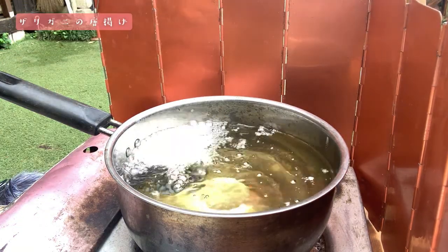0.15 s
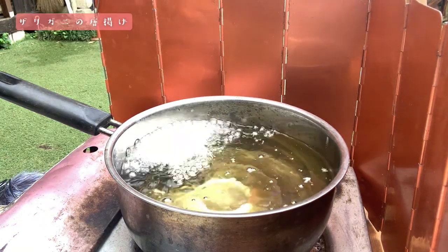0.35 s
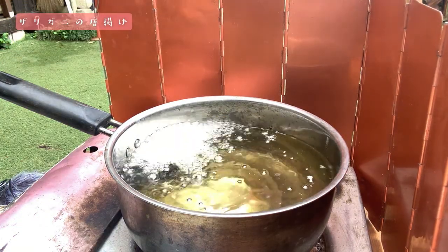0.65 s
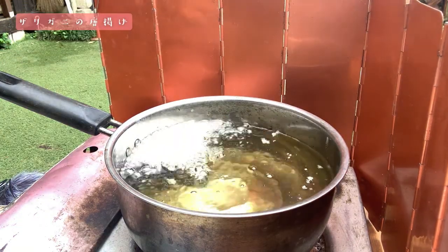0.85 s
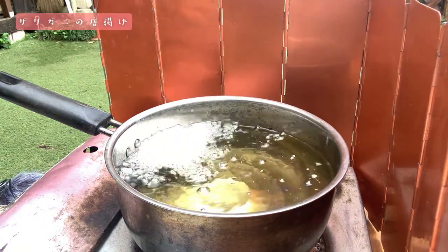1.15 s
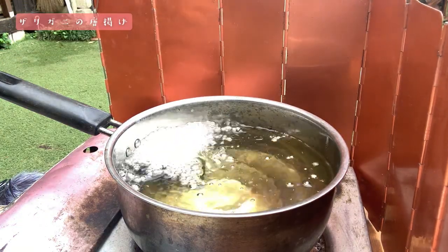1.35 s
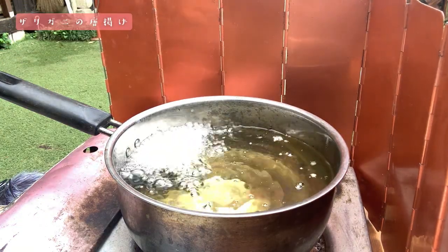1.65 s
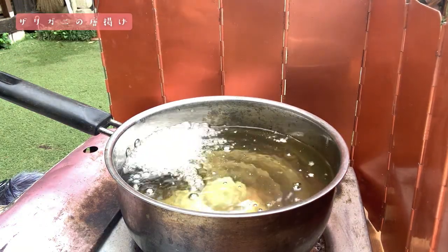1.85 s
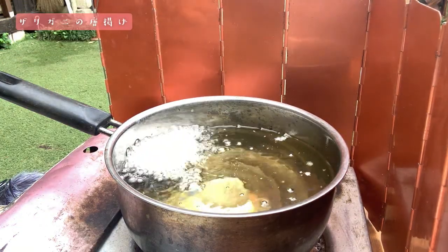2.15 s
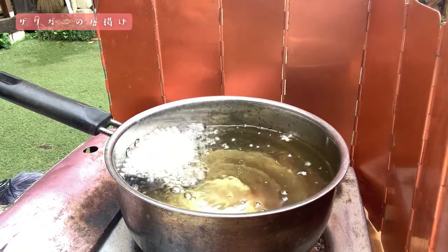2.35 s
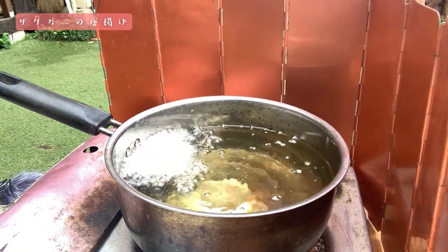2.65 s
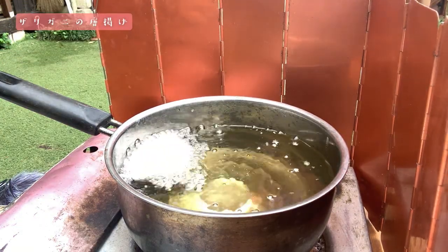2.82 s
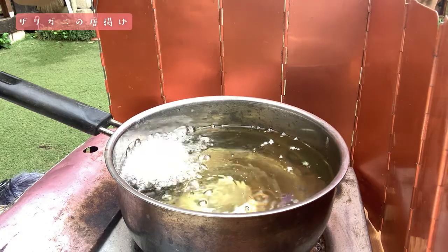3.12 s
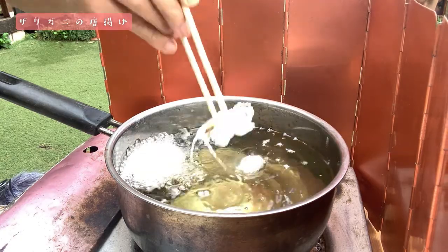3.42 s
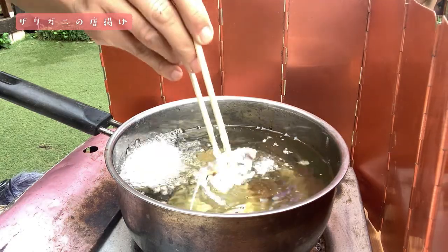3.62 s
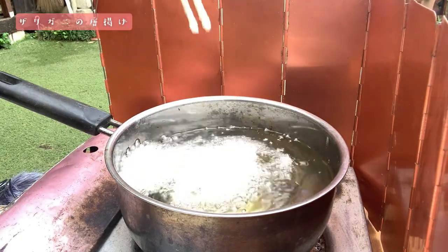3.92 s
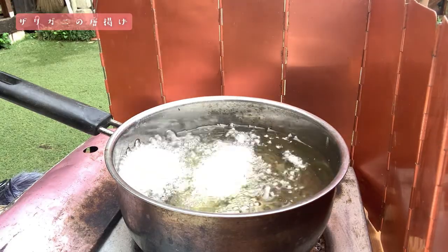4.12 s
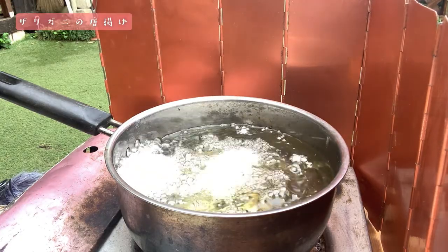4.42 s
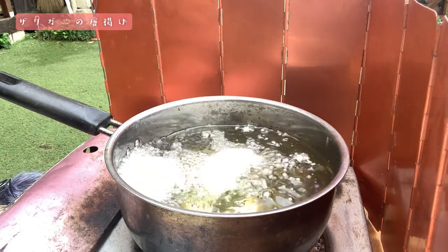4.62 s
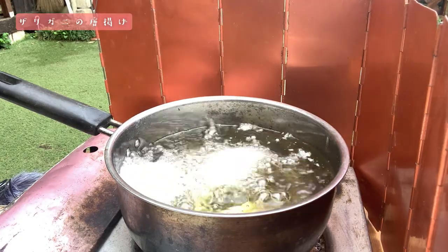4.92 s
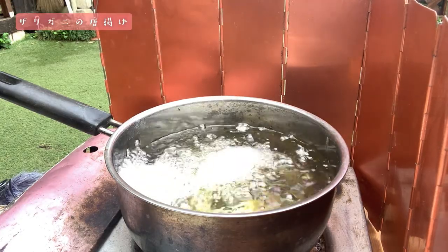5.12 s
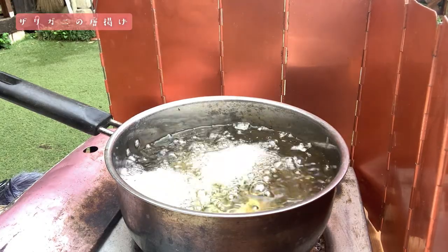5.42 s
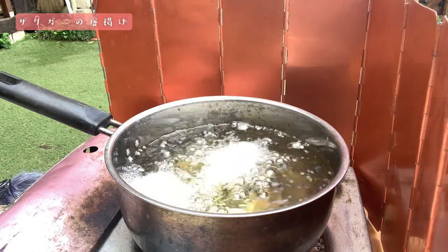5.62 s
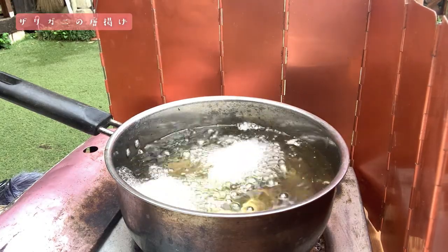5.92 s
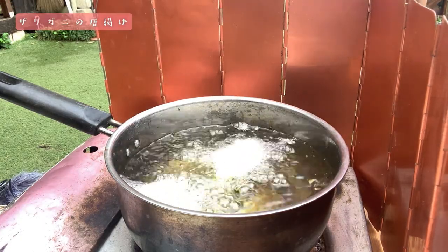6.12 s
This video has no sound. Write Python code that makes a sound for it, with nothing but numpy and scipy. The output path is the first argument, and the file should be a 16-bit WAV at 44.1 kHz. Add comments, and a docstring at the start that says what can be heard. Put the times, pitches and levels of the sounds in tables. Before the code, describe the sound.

Batter frying in a steel pan of hot oil outdoors, ringing metallic pops, fine fizz and dry snaps, then a new piece slides in hissing.

```python
"""Fine fizz, a fading low tone and, at once, a volley of ringing bursts: batter fries in a steel saucepan of hot oil.
The place is outdoors, in front of a sheet-metal wind shield; burner and open air rush evenly behind the pan.
Steam pockets burst in the oil and set the metal ringing; droplets sputter and small bubbles snap dryly.
After three seconds a new piece drips and slides in with a bright hiss.
A light breeze and a few low puffs brush the microphone."""
import sys
import numpy as np
from scipy import signal
from scipy.fft import irfft
from scipy.io import wavfile

SR = 44100
rng = np.random.default_rng(int(sys.argv[2]) if len(sys.argv) > 2 else 0)


def pcm_store(signal):
    """Save signal as 16-bit PCM."""
    levels = np.round(np.clip(np.atleast_2d(signal), -1, 1) * 32767)
    wavfile.write(sys.argv[1], SR, levels.astype(np.int16).T)


N = 276066


def gain_of(db):
    """Amplitude factor of a level in dB."""
    return 10 ** (np.asarray(db) / 20)


def evened(x):
    """The same sound at rms 1."""
    return x / np.sqrt(np.mean(x ** 2) + 1e-20)


def read(points, hz):
    """A spectrum in dB, joined on a log-frequency axis."""
    f, value = np.transpose(points)
    return np.interp(np.log(hz + 1), np.log(f + 1), value)


def level(curve):
    """A dB curve over time as a gain for every sample."""
    return gain_of(np.interp(np.arange(N) / SR, *np.transpose(curve)))


def add(mix, s, sound):
    """Lays a sound into the mix at s seconds, cut off at the end of the mix."""
    part = mix[max(round(s * SR), 0):][:len(sound)]
    part += sound[:len(part)]


def dying(t, t60):
    """Exponential decay that falls 60 dB in t60 seconds."""
    return np.exp(-np.log(1000) * t / t60)


def causal(db_at, size=2048):
    """Minimum-phase impulse response with the shape of a dB spectrum, scaled to energy 1."""
    hz = abs(np.fft.fftfreq(size, 1 / SR))
    log_gain = np.log(gain_of(db_at(hz)))
    minimum_phase = np.exp(np.conj(signal.hilbert(log_gain)))
    response = np.fft.ifft(minimum_phase).real[:size // 2]
    return response / np.linalg.norm(response)


def coloured(x, spectrum):
    """Filters x by a spectrum; rms 1."""
    response = causal(lambda hz: read(spectrum, hz), size=8192)
    return evened(signal.oaconvolve(x, response)[:len(x)])


def cavity(hz, pitch_hz, q, slope, leak_db=-20):
    """dB spectrum of a bursting bubble: weak below its resonance, sloping above, dull at the very top."""
    r = hz / pitch_hz
    resonance = r ** 4 / ((1 - r ** 2) ** 2 + (r / q) ** 2) + gain_of(leak_db) ** 2
    ends = [(60, -56), (200, 4), (400, 6.5), (6500, 1.5), (9500, -6.5), (16000, -17.5)]  # f/Hz, level/dB
    tilt_db = slope * np.log2(1 + r ** 2) / 2
    return 10 * np.log10(resonance) + tilt_db + read(ends, hz)


def strong_few(most):
    """Random strength for every sample: mostly small, now and then large, never above most."""
    return np.minimum(rng.exponential(1, N), most)


def crackle(per_s, spread_db, q, low_hz, high_hz, count=14):
    """A swarm of tiny bubbles of many pitches, most faint and a few strong; rms 1."""
    out = np.zeros(N)
    for pitch_hz in np.geomspace(low_hz, high_hz, count):
        strength_db = spread_db * strong_few(3)
        clicks = gain_of(strength_db) * (rng.random(N) < per_s / count / SR)
        bubble = causal(lambda hz: cavity(hz, pitch_hz, q, slope=2.5), size=512)
        out += signal.oaconvolve(clicks, bubble)[:N]
    return evened(out)


# Rise and fall of the fine bubbling round the food: t/s, level/dB
FIZZ_LEVEL = [(0, -53.5), (1.2, -50), (1.8, -60), (2.3, -53), (2.65, -43.5), (3, -50.5), (3.5, -51.5),
              (5, -45), (5.5, -55.5), (6.26, -51.5)]
# Spectrum of its close prickle: f/Hz, level/dB
FIZZ_COLOUR = [(300, 12), (700, 1.5), (2500, -15), (7000, -15.5), (11000, -20), (16000, -5)]


def fizz(fizz_db=-4, bubbles_db=-4, pinpricks_db=-11):
    """Steam leaves the food: a close prickle, rounder bubbles that stand out of it, and the finest bright ticks."""
    swarm = crackle(per_s=500, spread_db=10.5, q=3.4, low_hz=1080, high_hz=8950)
    prickle = gain_of(fizz_db) * coloured(swarm, FIZZ_COLOUR)
    rounder = crackle(per_s=140, spread_db=4.5, q=10, low_hz=1600, high_hz=7130)
    ticks = crackle(per_s=29, spread_db=7.5, q=1.4, low_hz=8000, high_hz=14000, count=4)
    return level(FIZZ_LEVEL) * (prickle + gain_of(bubbles_db) * rounder + gain_of(pinpricks_db) * ticks)


def hum(hz=121.0, db=-53, t60=2.5):
    """A faint low sine tone dies away exponentially from the start."""
    t = np.arange(N) / SR
    return gain_of(db) * np.sin(2 * np.pi * hz * t) * dying(t, t60)


# A light breeze on the microphone, whose level wavers by this rms, at random rates up to this one
BREEZE_DB, BREEZE_WAVER_DB, BREEZE_WAVER_HZ = -64.5, 6.5, 13
# Soft low puffs of air, as from a hand moving near the microphone:
# t/s of the crest, level/dB, half width/s (where the puff is down to 1/e)
PUFFS = [(3.1, -67, .2), (3.8, -51.5, 0.12), (4.24, -49.5, 0.049), (4.369, -43, 0.028), (4.5, -52, 0.076),
         (5.7, -61, 0.085)]


def air_strength(count=20):
    """The breeze wavers by chance; each puff of air rises and falls on top of it."""
    t = np.arange(N) / SR
    waver = np.zeros(N)
    for share, phase in rng.random((count, 2)):
        waver += np.sin(2 * np.pi * (BREEZE_WAVER_HZ * share * t + phase))
    puffs = sum(gain_of(db) * np.exp(-((t - s) / width_s) ** 2) for s, db, width_s in PUFFS)
    return gain_of(BREEZE_DB + BREEZE_WAVER_DB * evened(waver)) + puffs


RUSH_DB = -52
# Spectrum of burner and open air: f/Hz, level/dB
RUSH_COLOUR = [(20, -40), (45, -9), (80, -2), (170, -3), (480, -1), (640, -6), (800, -2), (1400, -2),
               (2600, -3), (4500, -10), (7500, -17), (10000, -26), (16000, -32)]
# Spectrum of breeze and puffs at the microphone: f/Hz, level/dB
BREEZE_COLOUR = [(25, -34), (45, -3), (70, 2), (100, -1.5), (170, -9.5), (300, -36), (700, -26)]


def outdoors():
    """Coloured noise: the even rush of burner and open air, and the low rumble of breeze and puffs."""
    rush, rumble = rng.standard_normal((2, N))
    return gain_of(RUSH_DB) * coloured(rush, RUSH_COLOUR) + air_strength() * coloured(rumble, BREEZE_COLOUR)


def struck(modes, t, spread_db):
    """Modes struck at a random place, which decides how strongly each one answers; starts at about rms 1."""
    hz, db, t60 = np.transpose(modes)
    weights = gain_of(db + spread_db * rng.standard_normal(len(hz)))
    turns = hz[:, None] * t + rng.random((len(hz), 1))
    decay = dying(t.astype(np.float32), t60[:, None].astype(np.float32))
    ring = np.sin((2 * np.pi * turns).astype(np.float32)) * decay
    return np.sqrt(2) * (weights @ ring) / np.linalg.norm(weights)


def clang(t, t60, gap_hz=55, spread_db=5.5, lumps_db=3, lump_hz=260, treble_life=0.76,
          linger_db=-17, linger_t60=0.38):
    """The metal's crowd of short modes, uneven in strength; treble dies at its own rate, a faint part lingers."""
    hz = np.fft.rfftfreq(len(t), 1 / SR)
    knots = np.arange(0, SR / 2, lump_hz)
    lumps = np.interp(hz, knots, rng.standard_normal(len(hz))[:len(knots)])
    treble = 1 / (1 + (6000 / (hz + 1)) ** 4)

    def crowd(share):
        """Random modes, denser with pitch, in the given share of the spectrum's power."""
        present = rng.random(len(hz)) < hz[1] / gap_hz * (1 + hz / 4000)
        weights = present * gain_of(lumps_db * lumps + spread_db * rng.standard_normal(len(hz)))
        lines = weights * np.exp(2j * np.pi * rng.random(len(hz)))
        return evened(irfft(lines * np.sqrt(share))) * np.sqrt(share.mean())

    body = crowd(1 - treble) * dying(t, t60)
    bright = crowd(treble) * dying(t, t60 * treble_life)
    lingering = gain_of(linger_db) * crowd((1 - treble) ** 2) * dying(t, linger_t60)
    return body + bright + lingering


# Small, high cavities die sooner and ring the pan less; decay and ring level below hold at MID_HZ
MID_HZ = 1000
BURST_T60_S, T60_POWER = 0.16, -0.28  # decay time, its power of pitch
# The pan's ring for a burst of 0 dB, the share of the burst's dB that it follows, its change with pitch
RING_DB, RING_FOLLOWS, RING_DB_PER_OCTAVE = -25, 0.47, -1.86
# Treble slope above the cavity pitch, in dB per octave: a base for Q 1, and a rise with sharpness
BURST_SLOPE_DB, SLOPE_DB_PER_DOUBLING_Q = -2.5, 0.47
# Extra slope of a small burst at SMALL_HZ; it goes with the square of pitch
SMALL_SLOPE_DB, SMALL_HZ = 3.5, 5000
SHIELD_T60_S = 0.24
# Strongest modes of the thin wind shield: f/Hz, level/dB
SHIELD_MODES = [(432, -3), (538, -2), (758, 1), (844, 1), (1105, 1), (1290, 0), (1470, 2), (1799, 2),
                (2421, 3), (3383, 0), (3571, 0)]
# Long modes of the steel pan: f/Hz, level/dB, t60/s
PAN_MODES = [(662, 0, 1.15), (758, 2, .3), (904, 0, .25), (1061, 0, .6), (1136, 0, .3), (1410, -3, .5),
             (1484, 0, .75), (1530, 0, .45), (1663, -1, .35), (1799, -2, .35), (1866, -4, .7),
             (1908, -1, .55), (2363, 0, .95), (2480, -4, .5), (2730, -2, .35), (2940, 0, .4),
             (3085, -2, .4), (3735, -1, .35), (3897, 0, .4)]
# Steam bursts in the oil: t/s, level/dB, cavity pitch f/Hz, sharpness Q, centre of the pan modes struck f/Hz
STEAM_BURSTS = [(.001, -31, 1240, 2.9, 1390), (.032, -16, 4600, 1.3, 1600), (0.035, -21.5, 1480, 14, 1560),
                (0.078, -21, 1390, 4.1, 1500), (.142, -24, 800, 2, 1040), (.284, -29.5, 940, 1.2, 1200),
                (.513, -25.5, 830, 0.48, 1190), (0.57, -14.5, 930, 1.2, 1240), (.656, -26, 844, .8, 850),
                (.792, -15, 603, 0.39, 740), (0.821, -19.5, 810, 5.5, 800), (.858, -24.5, 590, 0.47, 1900),
                (.885, -21, 3980, 2.3, 2280), (.917, -26, 2600, 1, 2530), (1, -29.5, 4760, 2.2, 3750),
                (1.3953, -19.5, 3430, 2, 1530), (1.418, -20.5, 3340, 1, 2900),
                (1.552, -19, 5700, 4.6, 2560), (2.151, -34, 4860, 18, 3640), (2.443, -41, 1970, 0.5, 4000),
                (2.838, -21, 3780, 4.5, 3100), (3.08, -19.5, 2560, 0.64, 2720),
                (3.095, -14, 1020, 1.8, 1220), (3.154, -31, 1610, 0.17, 1670),
                (3.236, -27.5, 6860, 9.3, 3000), (3.483, -29.5, 2070, 1, 3000),
                (3.656, -25.5, 460, 3.5, 1340), (3.683, -27.5, 980, 1.3, 1280),
                (3.714, -23.5, 4000, 1.5, 3700), (3.814, -20, 2080, 0.76, 1980),
                (3.859, -29, 1850, 0.44, 1710), (3.89, -18, 1610, .7, 1850), (4.034, -24, 5640, 3.9, 3020),
                (4.038, -20.5, 1070, 6.7, 1170), (4.308, -18.5, 1440, 1.54, 1750),
                (4.415, -21.5, 2020, 0.5, 2000), (4.545, -19, 1830, .65, 1820),
                (4.644, -27.5, 1260, 0.43, 1800), (4.678, -15.5, 1140, 1.4, 1240),
                (4.751, -24.5, 1060, 0.55, 1680), (4.79, -25, 2800, 1.8, 2800),
                (4.852, -23, 3800, 4.8, 3730), (4.925, -30.5, 540, 1.5, 1900),
                (4.974, -23, 2830, 0.29, 3400), (5.079, -27, 4680, 32, 4500), (5.116, -27, 2770, 2.5, 2680),
                (5.154, -25, 2960, 0.61, 2800), (5.245, -26, 1270, 0.94, 1310),
                (5.291, -25.5, 5630, 4.5, 3770), (5.573, -26, 780, .9, 1340),
                (5.655, -33.5, 1400, 0.28, 1740), (5.733, -21, 1940, 1.8, 1880),
                (5.766, -27.5, 1510, 0.3, 1690), (5.83, -31.5, 5800, 3.2, 3800),
                (6.158, -24, 1180, 1.2, 1350)]


def bursts(shield_db=-19, shield_spread_db=5, shield_detune=0.0088, pan_spread_db=2,
           focus_db=15, focus_power=0.26, rise_s=0.0016, size=32768):
    """Each steam burst shakes shield and pan, coloured by the cavity that it opens in the oil."""
    out, t = np.zeros(N), np.arange(size) / SR
    short = t[:size // 2]
    for s, db, pitch_hz, q, centre_hz in STEAM_BURSTS:
        height = pitch_hz / MID_HZ
        slope = BURST_SLOPE_DB + SLOPE_DB_PER_DOUBLING_Q * np.log2(q)
        slope += SMALL_SLOPE_DB * (pitch_hz / SMALL_HZ) ** 2

        shield = [(hz * (1 + shield_detune * rng.standard_normal()), mode_db, SHIELD_T60_S)
                  for hz, mode_db in SHIELD_MODES]
        metal = clang(short, BURST_T60_S * height ** T60_POWER)
        metal += gain_of(shield_db) * struck(shield, short, shield_spread_db)
        metal *= 1 - np.exp(-short / rise_s)
        colour = causal(lambda hz: cavity(hz, pitch_hz, q, slope))
        add(out, s, gain_of(db) * signal.fftconvolve(metal, colour))

        # the pan sings on, most in the modes near the centre; a sharper burst picks out fewer of them
        ring_db = RING_DB + RING_FOLLOWS * db + RING_DB_PER_OCTAVE * np.log2(height)
        loss_per_octave = focus_db * q ** focus_power
        pan = [(hz, mode_db - loss_per_octave * abs(np.log2(hz / centre_hz)), t60)
               for hz, mode_db, t60 in PAN_MODES]
        ring = struck(pan, t, pan_spread_db) * (1 - np.exp(-t / rise_s))
        add(out, s, gain_of(ring_db) * ring)
    return out


def sputter(db=-12, per_s=75, life_s=0.046, ring_t60=0.031, q=7, spread_db=2.0, count=20, size=4096):
    """Each burst throws up droplets that fall back and pop, weaker where their pitch is below their parent's."""
    out, t = np.zeros(N), np.arange(size) / SR
    flight = np.exp(-np.arange(SR // 2) / SR / life_s)
    for pitch_hz in np.geomspace(700, 9500, count):
        thrown = np.zeros(N)
        for s, burst_db, parent_hz, *_ in STEAM_BURSTS:
            add(thrown, s, gain_of(burst_db) * min(pitch_hz / parent_hz, 1) ** 2 * flight)
        # chance pops at an even rate, heard as far as droplets are in flight
        pops = (rng.random(N) < per_s / count / SR) * gain_of(spread_db * strong_few(2))
        ring = signal.lfilter(*signal.iirpeak(pitch_hz, q, fs=SR), rng.standard_normal(size))
        out += signal.oaconvolve(pops * thrown, evened(ring) * dying(t, ring_t60))[:N]
    return gain_of(db) * out


# Scatter of the faint snaps: level and pitch either way, round this pitch and sharpness
PATTER_SPREAD_DB, PATTER_HZ, PATTER_OCTAVES, PATTER_Q = 5.0, 5100, 1, 2.5
# Spells of faint snaps at random: start t/s, end t/s, snaps per s, level/dB
PATTER = [(0, 6.26, 13, -39.5), (2.4, 2.7, 35, -44)]


def faint_snaps(most=400):
    """Rows like those of LOUD_SNAPS for the small bubbles that break at random."""
    rows = []
    for start, end, per_s, db in PATTER:
        draws = rng.uniform(-1, 1, (most, 4))[:round(per_s * (end - start))]
        for when, force, pitch, sharp in draws:
            s = start + (end - start) * (when + 1) / 2
            pitch_hz = PATTER_HZ * 2 ** (PATTER_OCTAVES * pitch)
            rows.append((s, db + PATTER_SPREAD_DB * force, pitch_hz, PATTER_Q * 2 ** sharp))
    return rows


# Treble slope in dB per octave, at Q 1 and its change: a dry snap is bright, a round plop is dark
SNAP_SLOPE_DB, SNAP_SLOPE_DB_PER_DOUBLING_Q = 5, -3.5
# The loudest surface bubbles snapping: t/s, level/dB over 1 ms, cavity pitch f/Hz, sharpness Q
LOUD_SNAPS = [(0.0321, -11, 4040, 2.5), (.245, -23.5, 3650, 2.6), (0.3365, -26, 6900, 0.23),
              (1.1409, -25, 2220, 3.3), (1.5442, -13.5, 1400, 1.4), (1.552, -6.5, 6260, 1.8),
              (1.6474, -12.5, 1750, 1.05), (1.9062, -34.5, 2000, 1.04), (1.965, -31.5, 2190, 3.4),
              (2.0629, -29.5, 5470, 1.4), (2.1057, -29, 740, 2.3), (2.3985, -29, 9900, 1.8),
              (2.4318, -28, 5630, 0.49), (2.443, -17.5, 2090, 9), (2.4867, -30.5, 900, 1.2),
              (2.516, -16, 3630, 0.63), (2.576, -25, 2500, 1.3), (2.6186, -32.5, 5500, 1.3),
              (2.6847, -37, 2200, 2.5), (2.752, -34, 1500, 0.57), (3.0058, -26.5, 2740, 5.5),
              (3.052, -27, 2070, 1.2), (3.2792, -22, 2600, 3), (3.4137, -27, 2800, 2),
              (3.4903, -24.5, 4800, 1.4), (3.634, -22, 8200, 2.9), (3.956, -28, 6500, 5.5),
              (4.0402, -17, 1070, 3.3), (4.1451, -12, 2160, 7.3), (4.3453, -12.5, 3000, .55),
              (5.0817, -24, 4750, 12), (5.3778, -28, 1500, 2), (5.4149, -24, 3440, 3.7),
              (5.4721, -26.5, 10400, .9), (5.949, -24, 2130, 3.7)]


def snaps(scatter_db=-3, scatter_t60=0.015, wall_db=-17, wall_t60=0.14, size=4096):
    """A bubble's film breaks: a few cycles of its cavity, with faint echoes from the pan wall."""
    out, t = np.zeros(N), np.arange(size) / SR
    millisecond = SR / 1000  # in samples
    for s, db, pitch_hz, q in LOUD_SNAPS + faint_snaps():
        slope = SNAP_SLOPE_DB + SNAP_SLOPE_DB_PER_DOUBLING_Q * np.log2(q)
        paths = signal.unit_impulse(size)  # the direct path
        for echo_db, t60 in ((scatter_db, scatter_t60), (wall_db, wall_t60)):
            echoes = rng.standard_normal(size) * dying(t, t60)
            paths = paths + gain_of(echo_db) * echoes / np.linalg.norm(echoes)
        snap = signal.fftconvolve(paths, causal(lambda hz: cavity(hz, pitch_hz, q, slope)))
        add(out, s, gain_of(db) * np.sqrt(millisecond) * snap / np.linalg.norm(snap))
    return out


# The new piece heats through after the last dip: its hiss grows to this level in this time
HISS_DB, HISS_GROWTH_S = -56.5, 2.5
SEAR_ATTACK_SHARE, SEAR_T60_S = 0.39, 0.24  # the rise takes this share of the hold; decay after the hold
# Spectrum of the flashing steam: f/Hz, level/dB
SEAR_COLOUR = [(400, -18), (1500, -14.5), (3500, -9), (7000, -4.5), (10000, -9), (14000, -5.5),
               (16000, -18)]
# Wet batter meets the oil, first a drip and then the piece: t/s, level/dB, hold/s
DIPS = [(3.326, -33.5, 0.01), (3.575, -34, 0.094)]


def sear():
    """Water on fresh batter flashes to steam: a bright, dense hiss at each dip, then a faint one that grows."""
    t = np.arange(N) / SR
    spray = rng.standard_normal(N) * gain_of(4.5 * strong_few(4))
    spray *= rng.random(N) < 7000 / SR  # 7000 flashes a second
    last_dip_s = DIPS[-1][0]
    steam = gain_of(HISS_DB) * np.clip((t - last_dip_s) / HISS_GROWTH_S, 0, 1)
    for s, db, hold_s in DIPS:
        rise = np.minimum(t / (SEAR_ATTACK_SHARE * hold_s), 1)
        fall = dying(np.maximum(t - hold_s, 0), SEAR_T60_S)
        add(steam, s, gain_of(db) * rise * fall)
    return steam * coloured(spray, SEAR_COLOUR)


def scene():
    """Pan, oil, burner and moving air summed at one microphone."""
    return (bursts() + sputter() + snaps() + fizz() + sear() + outdoors() + hum())[None]


def record(dry, lowest_hz=38, ceiling=0.55, edge_hz=16050):
    """The recorder cuts the lowest bass, rounds off the sharpest peaks and limits the band."""
    dry = signal.sosfilt(signal.butter(4, lowest_hz, "high", fs=SR, output="sos"), dry)
    rounded = ceiling * np.tanh(dry / ceiling)
    band = signal.firwin(511, edge_hz, window=("kaiser", 9), fs=SR)
    return signal.oaconvolve(rounded, band[None], "same")


dry = scene()
out = record(dry)
pcm_store(out)
```